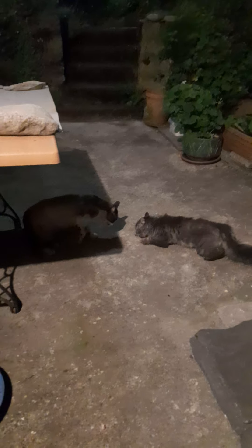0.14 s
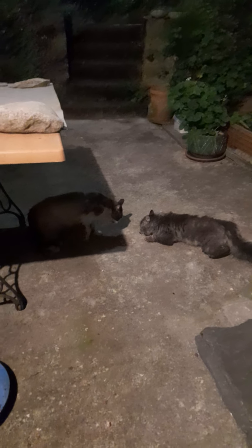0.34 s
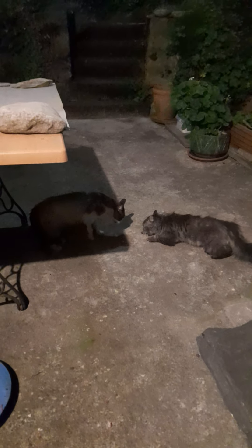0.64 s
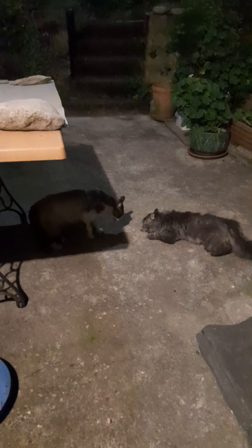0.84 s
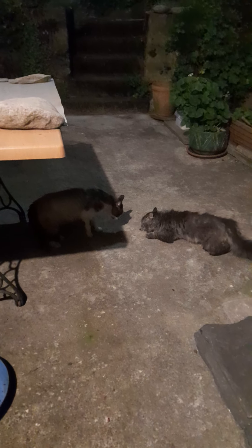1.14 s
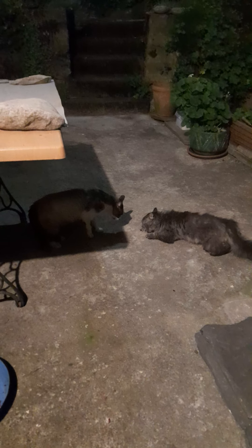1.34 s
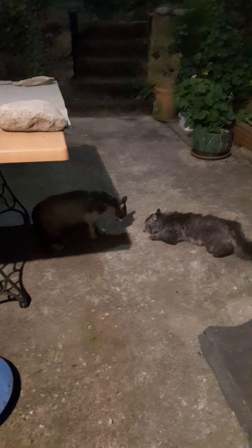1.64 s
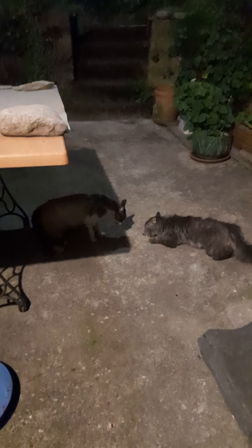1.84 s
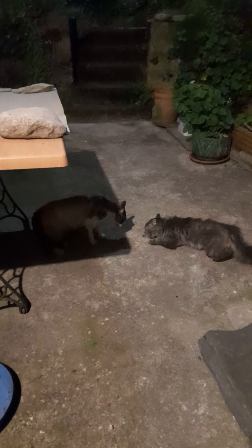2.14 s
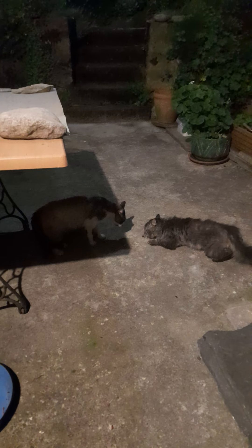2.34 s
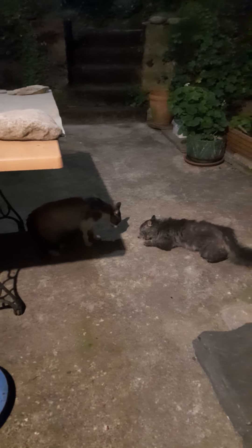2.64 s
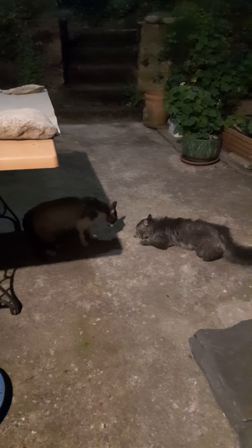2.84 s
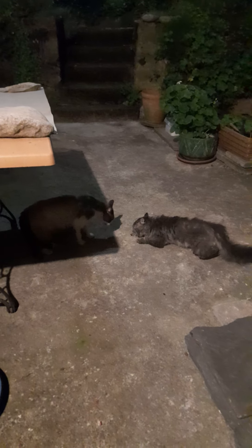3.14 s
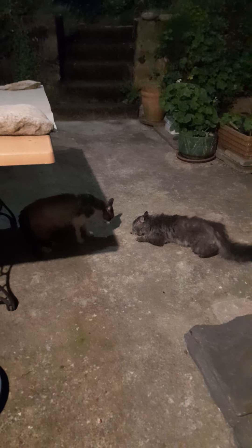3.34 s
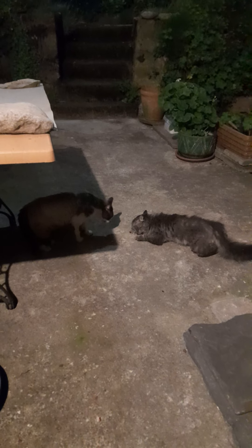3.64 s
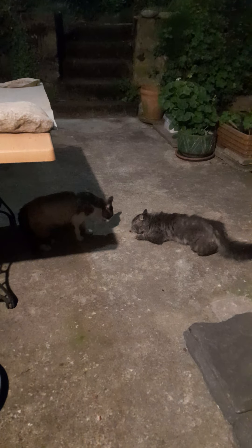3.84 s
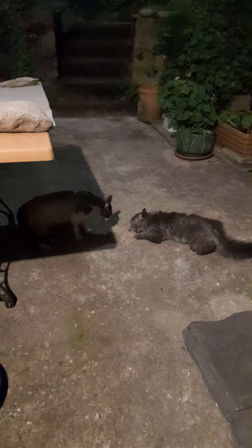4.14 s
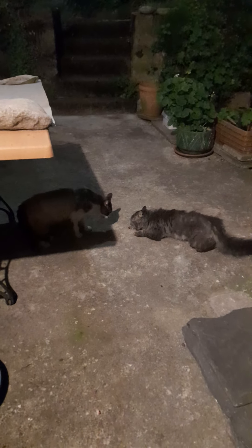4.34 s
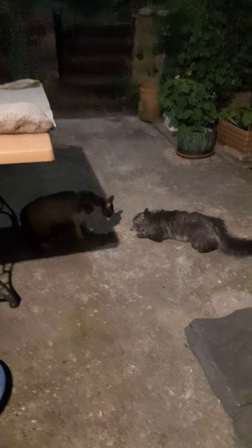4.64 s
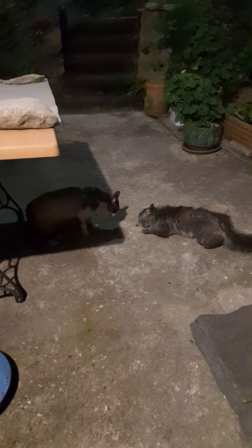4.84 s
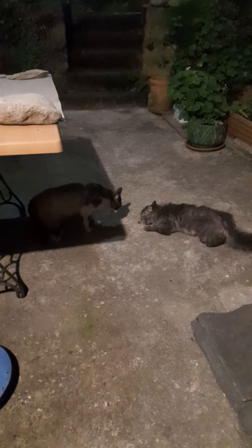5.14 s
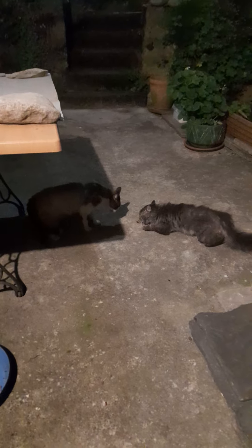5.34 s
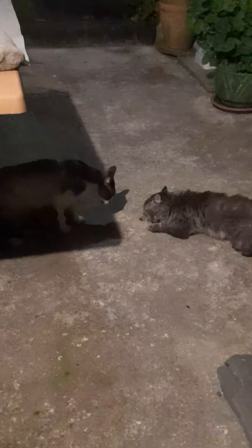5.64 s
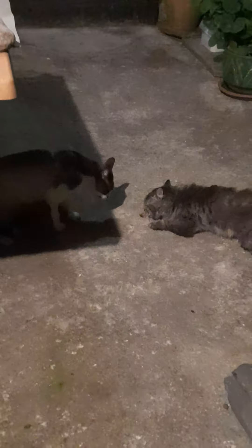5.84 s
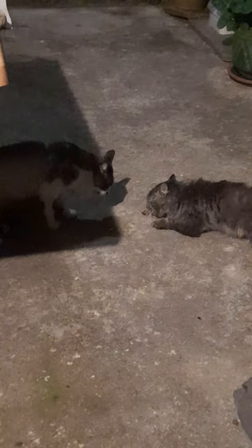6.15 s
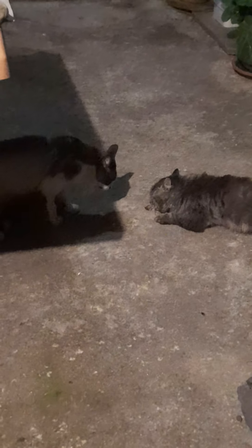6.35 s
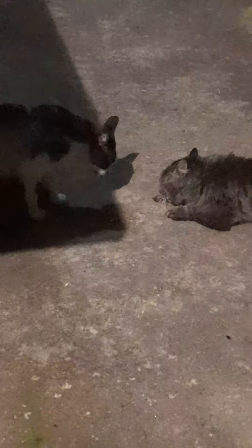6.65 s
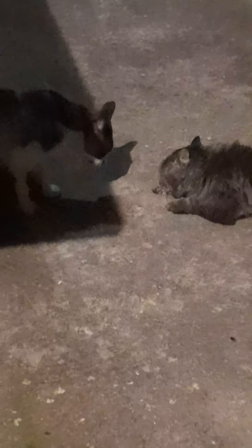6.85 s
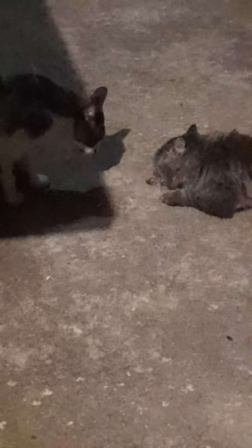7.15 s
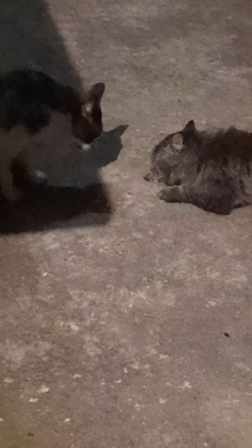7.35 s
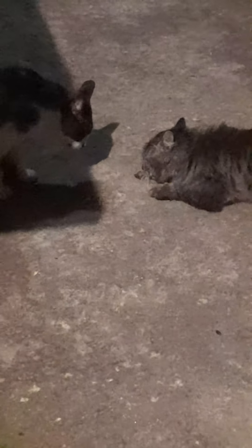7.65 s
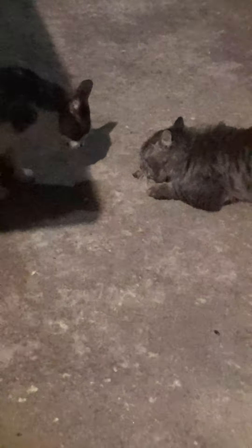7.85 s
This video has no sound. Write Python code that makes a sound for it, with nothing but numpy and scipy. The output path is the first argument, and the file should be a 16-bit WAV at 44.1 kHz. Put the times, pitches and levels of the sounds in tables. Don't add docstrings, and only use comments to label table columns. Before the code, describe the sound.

A cat yowls at another on a walled patio, two long wavering cries sinking into growls and croaks, with a quiet low moan underneath.

```python
import sys
import numpy as np
from scipy import signal
from scipy.fft import rfft, irfft, next_fast_len
from scipy.io import wavfile
from scipy.ndimage import uniform_filter1d

SR = 44100
rng = np.random.default_rng(int(sys.argv[2]) if len(sys.argv) > 2 else 0)


def wrap_up_sound(samples):
    columns = np.atleast_2d(samples).T
    tamed = np.clip(columns, -1, 1)
    steps = np.round(tamed * 32767).astype(np.int16)
    wavfile.write(sys.argv[1], SR, steps)


def nominal_scale(level):
    x = np.asarray(level, float) / 20
    return 10 ** x


N = 353139

# f/Hz, level/dB
HIGH_RESONANCES = [(5400, -14), (6500, -13), (7200, -15), (8100, -7.5), (8900, -20), (11000, -43.5)]
PORT_LEAD = .22


def evened(x):
    return x / np.sqrt(np.mean(x ** 2) + 1e-20)


def read(points, hz):
    f, value = np.transpose(points)
    return np.interp(np.log(hz + 1), np.log(f + 1), value)


def unrolled(rows):
    s, *columns = np.transpose(rows)
    n = np.arange(round(s[0] * SR), min(round(s[-1] * SR), N))
    return n[0], n / SR, [np.interp(n / SR, s, c) for c in columns]


def add(mix, start, sound):
    mix[:, start:start + sound.shape[1]] += sound


def bump(x, at, half):
    return np.exp(-np.minimum(((x - at) / half) ** 2, 30))


def wobble(count, span):
    step = max(span // 16, 1)
    knots = rng.standard_normal(count // step + 2)
    knots = uniform_filter1d(uniform_filter1d(knots, span // step), span // step)
    return np.interp(np.arange(count) / step, np.arange(len(knots)), evened(knots))


def coloured(x, points):
    size = next_fast_len(x.shape[-1])
    gain = nominal_scale(read(points, np.fft.rfftfreq(size, 1 / SR)))
    return irfft(rfft(x, size) * gain, size)[..., :x.shape[-1]]


def resonate(x, hz, width):
    turn = np.exp(2j * np.pi * np.cumsum(hz) / SR)
    r = np.exp(-np.pi * width / SR)
    return 2 * (turn * signal.lfilter([1 - r], [1, -r], x / turn)).real


def partial(angle, db, pan_db, lead):
    left, gap = nominal_scale(pan_db / 2), np.clip(lead, -2.6, 2.6)
    size = np.sqrt(8) * nominal_scale(db) / np.sqrt(left ** 2 + left ** -2. + 2 * np.cos(gap))
    return np.array([size * left * np.cos(angle + gap / 2), size / left * np.cos(angle - gap / 2)])


def night():
    # f/Hz, level/dB per Hz
    floor_colour = [(22, -42), (48, -18), (100, -13), (170, -12), (300, -13), (600, -11.5), (1200, -16.5),
                    (2500, -23.5), (5000, -34.5), (9000, -38), (11500, -31), (15700, -28)]
    # f/Hz, likeness [-1..1]
    likeness = [(30, 0), (150, 0), (400, 1), (2000, 0), (8000, 0), (15000, 0.082)]
    # t/s, half length/s, whole floor level/dB, extra breeze rumble level/dB
    gusts = [
        (0, 0.32, 1.5, -4),
        (1.017, 0.33, -3, 3),
        (2.003, 0.25, 0, -2.5),
        (4.002, 0.42, -0.5, 6),
        (4.455, 0.25, -11.5, 0),
        (4.737, 0.46, 5, 5),
        (5.392, 0.25, 4.5, 0),
        (6.395, 0.55, 0, 10.5),
        (7.699, 0.43, -2.5, -1.5),
    ]
    frames, hz = N // 256 + 5, np.fft.rfftfreq(1024, 1 / SR)
    a, b, c, d, patches = rng.standard_normal((frames, 513, 5)).T
    patches = evened(uniform_filter1d(uniform_filter1d(patches, 12, 0), 10, 1))
    same = np.clip(read(likeness, hz), -1, 1)[:, None]
    left = a + 1j * b
    z = np.array([left, same * left + np.sqrt(1 - same ** 2) * (c + 1j * d)])
    t = np.arange(frames) * 256 / SR
    db, breeze_db = sum(np.outer(levels, bump(t, at, half)) for at, half, *levels in gusts)
    swell_db = .7 * wobble(frames, span=12) + .8 * wobble(frames, span=2)
    low = 1 / (1 + (hz[:, None] / 200) ** 4)
    floor_db = -79 + 10.5
    z *= nominal_scale(read(floor_colour, hz)[:, None] + 0.6 * patches + swell_db + floor_db + db + low * breeze_db)
    z[:, 0] = 0
    return signal.istft(z, nperseg=1024, noverlap=768)[1][:, :N]


def patio():
    # f/Hz, t60/s
    decay = [(200, 0.12), (1000, 0.2), (3000, 0.12), (8000, 0.011)]
    taps = np.zeros((2, SR // 2))
    at = np.arange(300, SR // 2 - 20, 20) + rng.integers(0, 20, (2, (SR // 2 - 301) // 20))
    np.put_along_axis(taps, at, rng.choice([-1., 1.], at.shape), 1)
    hz, t, z = signal.stft(taps, SR, nperseg=256)
    tail = signal.istft(z * nominal_scale(-60 * t / read(decay, hz)[:, None]), SR, nperseg=256)[1]
    return tail / np.linalg.norm(tail[0])


def echoes(x):
    # t/ms after the direct sound, signed share
    left_taps = [(0.768, 0.452), (1.118, -0.276), (1.282, 0.456), (1.987, 0.239), (2.683, -0.191),
                 (4.984, 0.16), (9.684, 0.17), (17.012, 0.145)]
    # t/ms after the direct sound, signed share
    right_taps = [(0.337, 0.137), (1.31, 0.221), (2.462, -0.206), (4.092, -0.281), (5.892, -0.212),
                  (6.777, -0.099), (7.905, -0.133), (11.234, 0.101)]
    size = next_fast_len(x.shape[1] + 2000)
    hz = np.fft.rfftfreq(size, 1 / SR)
    paths = [1 + sum(share * np.exp(-2j * np.pi * hz * ms / 1e3) for ms, share in ear)
             for ear in (left_taps, right_taps)]
    return irfft(rfft(x, size) * paths, size)[:, :x.shape[1]]


def moan(rows):
    # f/Hz, level/dB
    muzzle = [(160, -8), (250, -1.5), (390, 6.5), (520, 12), (660, 3.5), (780, -4.5), (1000, -13.5),
              (1500, -33.5)]
    start, t, (hz, effort_db, step_db) = unrolled(rows)
    hz = hz * (1 + 0.003 * wobble(len(t), span=300))
    angle = 2 * np.pi * np.cumsum(hz) / SR
    voice = sum(partial(k * angle, effort_db + min(k - 1, 1.5) * step_db + read(muzzle, k * hz), 0.43, PORT_LEAD)
                for k in range(1, 5))
    return start, voice * signal.windows.tukey(len(t), .01)


def onset(t, fade_s):
    return (t[0] > 0) * np.exp(-(t - t[0]) / fade_s)


def folds(t, glide_hz):
    # t/s, pitch shift/Hz, level change/dB, half length/s
    catches = [(0.391, 2, 1.5, 0.0096), (0.691, 1.5, -2.5, 0.009056), (1.265, -2.5, 9, 0.026),
               (2.702, -8.5, 4.5, 0.033), (5.271, 0.5, -4, 0.042), (5.673, -3, 9.5, 0.03),
               (0.485, 11.5, -5.5, 0.0095), (0.115, 1.5, -3, .025), (1.538, -15, -6, 0.015),
               (1.579, 9.5, -1.5, 0.014), (1.96, 14, -8, 0.022), (2.12, 22, -4.5, 0.01),
               (2.196, 5.5, -2.5, .02), (2.295, 6.5, 1, 0.0058), (2.481, -10.5, -6, 0.013),
               (2.633, 13, -3, 0.007), (2.745, 8.5, -4.5, 0.0077), (4.794, -1, -3.5, .012),
               (5.401, 4.5, 2.5, 0.032), (6.974, 7, -4, 0.015), (7.082, 10, 2.5, 0.014),
               (7.189, 10.5, -2.5, .015), (7.329, 10.5, -3, 0.018), (7.434, 7, -3, 0.017),
               (7.509, 11, -2.5, 0.01), (7.591, 1.5, -2.5, 0.013), (0.787, 7, 1, .04),
               (1.32, -8.5, 3.5, .04), (1.909, -4, -1.5, 0.028), (2.199, -6, 0, 0.098),
               (4.749, -7.5, -0.9, 0.023), (4.832, 7.5, -1.5, .03), (5.018, -4.5, 3.5, 0.051),
               (5.596, 8.5, 3.5, 0.042), (5.735, -8.5, -1.5, 0.042), (6.602, 4.5, -2, .04),
               (6.936, -7, -2.5, 0.026), (7.361, 6, 2, 0.031), (7.12, -2, 2.5, 0.022)]
    # t/s, half length/s, share of pitch
    hoarse_stretches = [(.45, .12, .01), (1.42, .14, .012), (2.2, .1, .016), (2.55, .1, .016),
                        (2.8, .16, .013), (4.72, .09, .014), (5.62, .1, .012), (7.2, .3, .012)]
    hz = glide_hz + sum(jump_hz * bump(t, at, half) for at, jump_hz, _, half in catches)
    dip_db = sum(db * bump(t, at, 0.9 * half) for at, _, db, half in catches)
    unsteady = sum(share * bump(t, at, half) for at, half, share in hoarse_stretches)
    hz = hz * (1 + (.0018 + .3 * unsteady) * wobble(len(t), span=300))
    stumble = 2 * np.pi * np.cumsum(hz * unsteady * wobble(len(t), span=60)) / SR
    angle = 2 * np.pi * np.cumsum(hz) / SR
    return hz, dip_db, angle, stumble


def croak(t, bouts):
    rise, fall_db = 0.11, -20
    db, share = np.full(len(t), -99.), np.zeros(len(t))
    for start, length, top_db in bouts:
        u = (t - start) / length
        arch = np.where(abs(u - .5) < .5, np.interp(u, [0, rise, 1], [0, 1, 0]), -1)
        db = np.maximum(db, np.where(arch < 0, -99, top_db + fall_db * (1 - arch) ** 2))
        share = np.maximum(share, arch)
    return db, share


def rasp(angle, hz, every, db, slip, colour):
    on, out = db > -92, np.zeros((2, len(hz)))
    slide = wobble(len(hz), span=300)
    for k in range(every + 1, 6 * every):
        if k % every:
            drift = k * k + slip * np.roll(slide, k * 5003)[on]
            line_db = db[on] + 3 * slip * np.roll(slide, 9001)[on] + read(colour, k * hz[on] / every)
            out[:, on] += partial(k * angle[on] / every + drift, line_db, 0, 0.94)
    return out


def shifts_db(t, hz):
    # t/s, half length/s, f/Hz, level/dB
    passing_shifts = [(.55, 0.054, 525, -5), (0.85, .1, 600, 1), (2.98, .07, 1400, 6.5),
                      (2.38, 0.045, 525, 3), (.36, 0.055, 1990, -5), (0.783, .06, 1780, 2.5),
                      (5.18, 0.14, 575, 3.5), (5.7, 0.12, 340, -2.5), (7.6, 0.35, 510, 1.5),
                      (8.5, 0.041, 1410, 5), (0.64, 0.098, 1300, 1.5), (.9, 0.15, 1200, -8),
                      (1.191, 0.062, 1180, 4), (1.595, 0.084, 1010, -9), (2.3, 0.037, 1040, -11.5),
                      (4.97, 0.048, 1125, 3), (5.53, 0.076, 1050, -10.5), (9, 0.07, 935, -8),
                      (0.52, 0.14, 1530, -9), (1.7, 0.019, 1630, -2), (1.59, 0.033, 1520, 9),
                      (1.76, 0.066, 1390, 7), (2.06, .08, 1430, -8.5), (2.432, 0.22, 1540, -8.5),
                      (2.67, 0.049, 1460, -10.5), (4.8, .05, 1570, 9), (5.05, 0.064, 1700, -7.5),
                      (6, 0.05, 1660, 6.5), (6.87, 0.056, 1370, 8), (7.4, 0.14, 1440, -11),
                      (1.03, .06, 1815, -4), (3.71, 0.26, 830, -4), (0.88, 0.071, 1790, 4),
                      (.05, 0.08, 1400, -4), (3.3, 0.065, 1500, 5), (8.6, .06, 1860, -10),
                      (5.42, .1, 1650, 1.5), (4.15, 0.092, 1480, -20), (8.1, 0.045, 910, 5),
                      (5.06, 0.026, 1150, -2),
                      (.58, 0.055, 2120, 11.5), (1.25, 0.098, 2266, -10), (2.1, 0.096, 1920, 2.5),
                     (2.6, 0.057, 1963, -2), (4.92, 0.061, 2230, 16.5), (5.33, 0.083, 2220, -9),
                     (5.72, 0.063, 1980, 15), (6.12, 0.2, 1680, 6), (6.85, 0.091, 1827, -6),
                     (7.43, .03, 1933, 7), (7.14, .06, 1880, -8), (7.39, 0.02, 1412, 9.5),
                     (.6, .05, 2690, 7.5), (1.03, 0.043, 3040, -6), (1.29, 0.051, 2700, 19.5),
                     (1.55, 0.19, 2550, 14), (1.85, 0.19, 2320, -13.5), (2.12, 0.073, 2400, -10.5),
                     (2.6, 0.13, 2470, -12), (2.85, 0.033, 2345, -12), (4.75, 0.053, 2230, -10),
                     (4.97, 0.065, 2780, -19.5), (5.2, 0.19, 2880, -17.5), (6.0, 0.26, 2210, -16),
                     (7.2, 0.082, 2360, -15.5), (.1, 0.17, 2540, 4.5), (.46, 0.029, 2030, 4.5),
                     (2.2, 0.15, 2010, 4), (3.4, .3, 2580, 21.5), (5.58, .08, 2500, -11),
                      (.62, 0.043, 4250, 12), (.72, 0.046, 6390, 22), (0.949, 0.12, 5360, 9.5),
                  (1.101, 0.094, 4200, 7.5), (1.17, .05, 4740, 5.5), (1.309, 0.036, 3970, 8),
                  (1.36, .06, 3280, 1), (1.45, 0.1, 5050, -18), (1.52, 0.05, 5300, 14),
                  (1.55, 0.062, 3740, -16), (1.8, 0.14, 4260, 16.5), (1.801, .08, 2900, 20.5),
                  (2.199, .07, 3900, -10.5), (2.4, 0.084, 4300, 22), (2.711, 0.043, 4190, 5),
                  (2.86, 0.05, 4220, 2), (4.95, 0.17, 3230, 16), (4.9, 0.04, 3900, 6),
                  (5.05, 0.14, 4140, -12), (5.15, 0.085, 4580, 7.5), (5.38, 0.086, 4460, -19),
                  (5.5, 0.11, 5600, 22.5), (5.54, .05, 5050, 22.5), (5.75, 0.059, 4440, 6.5),
                  (6.15, 0.16, 3200, 10.5), (6.35, 0.052, 3880, 16.5), (6.151, 0.13, 4270, -10.5),
                  (7.9, .04, 4050, 5.5), (6.12, .1, 3750, -6), (6.7, .08, 2100, -6), (.77, .06, 4260, 17.5),
                  (.35, 0.046, 5870, 7), (5.1, 0.18, 8200, 9.5), (5.0, 0.067, 7900, 6),
                  (6.92, 0.12, 4160, -5.5), (1.38, 0.068, 4940, -15.5), (2.3, .15, 3600, 6.5),
                  (6.5, .15, 3080, 10), (5.0, 0.11, 6200, -14), (5.75, 0.092, 5350, -8.5),
                  (.08, 0.057, 4100, -3), (.3, 0.084, 1900, -4)]
    s, f = t[::128], hz[::128]
    rows = passing_shifts
    width_hz = 190
    return np.interp(t, s, sum(db * bump(s, at, half) * bump(f, mid_hz, width_hz) for at, half, mid_hz, db in rows))


def mouth_db(t, hz, effort_db, jaw):
    # f/Hz, level/dB
    shut = [(425, 7.5), (600, -3.5), (850, 1.5), (1150, -5), (1500, -29.5), (1900, -18), (2300, -22),
            (3000, -64.5)]
    # f/Hz, level/dB
    wide = [(425, -35), (600, -45), (850, 0.5), (1150, -20), (1500, -40), (1900, -10.5), (2300, -29.5),
            (3000, -45)]
    # t/s, half length/s, level/dB
    tongue = [
        (.56, .07, -22),
        (1.43, .055, -22),
        (2.3, .17, -12),
        (4.92, .05, -25),
        (5.47, .1, -15),
        (5.7, .12, -14),
        (5.9, .1, -25),
        (7.3, .15, -5),
    ]
    dull_db = sum(db * bump(t, at, half) for at, half, db in tongue)
    pursed = onset(t, fade_s=.09)
    levels = []
    for k in range(1, 6):
        f = k * hz
        db = effort_db + shifts_db(t, f) + (1 - jaw) * read(shut, f) + jaw * read(wide, f)
        db = db - 10 * bump(f, 2720, 90)
        db = db + 24.5 * pursed * bump(f, 1550, 356)
        levels.append(db + dull_db / (1 + np.exp((2180 - f) / 90)))
    return levels


def low_partials(t, angle, stumble, dip_db, low_db):
    stutter_db = -6.5 * bump(t, 7.14, .07) * np.cos((angle + 9 * stumble) / 12) ** 6
    voice = 0
    for k, db in enumerate(low_db, 1):
        catch_db = np.where(dip_db > 0, k == 2, 1) * dip_db
        db = db + (k > 1) * stutter_db + catch_db
        voice = voice + partial(k * (angle + 0.32 * stumble) + k - 1, db, 0, 0)
    return echoes(voice)


def high_partials(t, hz, angle, stumble, dip_db, jaw, ring_hz, ring_db, gape_db):
    # f/Hz, level/dB
    throat = [(3000, -23.5), (3500, -15), (3900, 0), (4200, 6), (4550, -6), (5400, -27), (6500, -51.5)]
    attack = onset(t, fade_s=.26)
    narrow = 1 + .6 * np.clip(1 - jaw, 0, 1)
    faint_db = 0.33 * np.minimum(ring_db + 76.5, 0)
    shrill = nominal_scale(-82) * bump(t, 5.4, .15)
    voice = np.zeros((2, len(t)))
    for k in range(6, 24):
        f = k * hz
        shimmer_db = shifts_db(t, f) + 4 * wobble(len(t), span=2500) + 2.1 * wobble(len(t), span=150)
        ring = nominal_scale(ring_db + faint_db + read(throat, 4200 * (f / ring_hz) ** narrow))
        high = nominal_scale(gape_db + read(HIGH_RESONANCES, f) + 31.5 * attack * bump(f, 6690, 600))
        high = high + shrill * bump(f, 12300, 1500)
        lead = .0006 * f + 2.5 * wobble(len(t), span=5000)
        phase = k * (angle + stumble) + k * k
        voice += (ring + high) * partial(phase, shimmer_db + np.minimum(dip_db, 0), lead, 1.5)
    return voice


def breathing(hz, jaw, low_db, breath_db, ring_hz, ring_db, gape_db):
    # f/Hz, level/dB
    breath_colour = [(500, -31), (800, -11.5), (1100, -2), (2350, 0), (2650, -27), (3300, -38), (4200, -30),
                     (9000, -68)]
    effort = np.sqrt(sum(nominal_scale(2 * db) for db in low_db[:3]))
    air = rng.standard_normal((2, len(hz)))
    puffs_db = breath_db + 3.5 * wobble(len(hz), span=400)
    breath = evened(coloured(air + 0.15 * air[::-1], breath_colour))
    breath = breath * nominal_scale(puffs_db) * uniform_filter1d(effort, size=3000)
    chest = evened(resonate(resonate(air, 0.52 * hz, 500), 0.52 * hz, 500))
    chest = chest * nominal_scale(low_db[0] - 34.0 - 8 * jaw)
    ring = evened(resonate(resonate(air, ring_hz, 800), ring_hz, 800)) * nominal_scale(ring_db - 9.5)
    upper_air = evened(coloured(air, HIGH_RESONANCES)) * nominal_scale(gape_db - 4.0 + np.array([[2.2], [-2.2]]))
    return breath + chest + ring + upper_air


def ghost(t, angle, first_db, jaw):
    return partial(angle - 2 * np.pi * 184 * t, first_db - 31.5 - 1.5 * jaw, 0, PORT_LEAD)


def yowl(rows):
    # t/s, length/s, level/dB
    every_2nd = [
        (3.15, 0.76, -68),
        (3.504, 0.84, -63.5),
        (7.599, 0.33, -69),
        (7.82, 0.16, -60.5),
    ]
    # t/s, length/s, level/dB
    every_3rd = [
        (7.035, .34, -57),
        (7.43, .15, -65),
        (7.77, .14, -66),
    ]
    # f/Hz, level/dB
    growl_colour = [(420, -10), (620, -6.5), (1050, 0), (1450, -24.5), (2150, -2.5), (2500, -20)]
    # f/Hz, level/dB
    rasp_colour = [(500, -28), (800, 0), (1250, -7), (1700, -12.5), (2150, -2), (2500, -29.5)]
    start, t, (glide_hz, effort_db, jaw, lips) = unrolled(rows)
    ring_hz = -1300 * onset(t, fade_s=.39) * jaw + 3992 + 3.63 * (glide_hz - 420)
    ring_hz = ring_hz + 7.8 * np.maximum(glide_hz - 509.3, 0)
    ring_db = -100 + 37 * lips
    gape_db = -106 + 26.5 * lips + 18.5 * jaw
    second_db, _ = croak(t, every_2nd)
    third_db, hoarse = croak(t, every_3rd)
    breath_db = -38 + 6 * hoarse + 8.5 * onset(t, fade_s=.26) + 0.5 * jaw
    hz, dip_db, angle, stumble = folds(t, glide_hz)
    low_db = mouth_db(t, hz, effort_db, jaw)
    voice = low_partials(t, angle, stumble, dip_db, low_db)
    voice += high_partials(t, hz, angle, stumble, dip_db, jaw, ring_hz, ring_db, gape_db)
    voice += rasp(angle, hz, every=2, db=second_db, slip=.9, colour=growl_colour)
    voice += rasp(angle, hz, every=3, db=third_db, slip=.22, colour=rasp_colour)
    voice += breathing(hz, jaw, low_db, breath_db, ring_hz, ring_db, gape_db)
    voice += ghost(t, angle, low_db[0], jaw)
    edge = np.minimum(1, np.minimum(t - t[0] + (t[0] < .01), t[-1] - t + (t[-1] > 8)) / .005)
    return start, voice * edge


def scene():
    # t/s, pitch f/Hz, effort level/dB, level step per partial/dB
    moan_1 = [(4.17, 385, -74, -17), (4.2, 382, -53.5, -6.5), (4.28, 400, -61, -5.5), (4.4, 351, -68, 0),
              (4.55, 333, -65, 6), (4.63, 302, -71, 5)]
    moan_2 = [(4.631, 309, -68, -1), (4.701, 312.2, -63.5, 7.5), (5.002, 250.7, -64.5, 0.5),
              (5.201, 235.5, -52.5, -13.5), (5.501, 256.4, -62.5, -1.5), (5.8, 265, -71, 7.5),
              (6.3, 256.3, -60.5, -5.5), (6.6, 219.2, -63, -0.5), (6.67, 233.2, -68.5, 5)]
    moan_3 = [(6.671, 237.8, -66, 3), (6.801, 212.3, -52.5, -7.5), (6.881, 184.7, -55.5, -7.5),
              (7.052, 176.3, -52.5, -10.5), (7.099, 160.9, -62, -3)]
    grunt = [
        (7.77, 492, -67.5, -22),
        (7.82, 510, -64.5, -22),
        (7.86, 533, -78, -14),
    ]
    # t/s, pitch f/Hz, effort level/dB, jaw opening [0-1], lips parted [0-1]
    rise_1 = [
        (0, 524, -33.5, 0.29, 0.77),
        (.06, 509, -44.5, 0.029, 0.99),
        (.15, 474.2, -31, 0.3, 0.8),
        (.25, 489.4, -30, 0.47, 0.8),
        (.39, 493.6, -29, 0.44, 0.78),
        (.46, 508.3, -26.5, 0.35, 0.81),
        (.59, 531.8, -20.5, 0.39, 0.9),
        (.71, 583, -15.5, 0.85, 0.68),
    ]
    cry_1 = [(.71, 587, -14, .85, 0.79), (0.83, 591.6, -9, 1.1, 0.69), (1.025, 605.1, -8.5, 1.15, 0.69),
             (1.15, 598.6, -12, 1, 0.81), (1.28, 550.5, -21.5, 0.63, 0.93),
             (1.379, 568.5, -25.5, 0.6, 0.81), (1.5, 527.8, -33, 0.19, 0.95), (1.551, 515, -35, 0.13, 1),
             (1.62, 494.6, -37.5, 0.19, 0.68)]
    waver_1 = [(1.62, 495.1, -34.5, 0.17, 0.62), (1.723, 458, -33, 0.28, 0.73),
               (1.95, 477.5, -27, 0.32, 0.85), (1.999, 467.2, -30, 0.33, 0.86),
               (2.368, 530.7, -29, 0.33, 0.57), (2.651, 486.9, -32, 0.34, 0.58),
               (2.762, 495.5, -34.5, 0.29, 0.6), (2.875, 460.6, -30.5, 0.35, 0.57),
               (2.998, 468.7, -43.5, 0.074, 0.35)]
    sink_1 = [(3.0, 467, -37, .14, 0.52), (3.16, 450.2, -40.5, 0.28, 0), (3.341, 432.5, -36.5, 0.35, 0.33),
              (3.54, 419.6, -40.5, 0.25, 0.16), (3.835, 413.5, -46.5, 0.071, 0.14),
              (4.001, 402.7, -52, 0.018, 0), (4.153, 365, -53.5, 0.064, 0.0026),
              (4.211, 345, -52, 0.094, 0.0046), (4.25, 361, -87, 0.58, 0.058)]
    cry_2 = [
        (4.66, 324, -47.5, 0.074, 0.11),
        (4.699, 415.4, -31, 0.39, 0.68),
        (4.779, 515.7, -23, 0.45, 0.9),
        (4.924, 557.4, -7.5, 1, 0.65),
        (5.098, 579.7, -13.5, 0.96, 0.8),
        (5.268, 571.9, -18.5, 0.74, 0.82),
        (5.473, 541.7, -24, 0.41, 0.83),
        (5.667, 462, -35.5, 0.25, 0.8),
        (5.75, 493.8, -40.5, 0.038, 0.85),
    ]
    drone_2 = [(5.75, 488, -32, .04, .75), (5.788, 488.3, -42, 0.039, 0.73),
               (5.861, 460, -41.5, 0.11, 0.59), (6.031, 420.1, -36, 0.24, 0.52),
               (6.21, 417.2, -35.5, 0.2, 0.55), (6.36, 431.5, -32, 0.4, 0.4),
               (6.499, 440.9, -34.5, 0.26, 0.48), (6.789, 451.7, -38.5, 0.31, 0.14),
               (6.972, 469.8, -39.5, 0.11, 0.43)]
    croak_2 = [(6.97, 472.0, -40.6, 0.04, 0.33), (7.26, 470.6, -38.5, 0.17, 0.32),
               (7.453, 475, -40.5, 0.16, 0.23), (7.528, 466.6, -39.5, 0.18, 0.22),
               (7.647, 473.8, -48.5, 0.052, 0.17), (7.775, 468.4, -44, 0.11, 0.15),
               (7.89, 463.5, -47.5, 0.087, 0.075), (8.007, 479.3, -63.5, -0.31, 0.08)]
    walls, floor, cats = patio(), night(), np.zeros((2, N))
    add(cats, *moan(moan_1 + moan_2[1:] + moan_3[1:]))
    add(cats, *moan(grunt))
    add(cats, *yowl(rise_1 + cry_1[1:] + waver_1[1:] + sink_1[1:]))
    add(cats, *yowl(cry_2 + drone_2[1:] + croak_2[1:]))
    reverb = signal.fftconvolve(cats, walls, axes=1)[:, :N]
    return nominal_scale(0.11) * cats + nominal_scale(-15.0) * reverb + floor


def roll_off(x):
    return signal.sosfilt(signal.butter(12, 15840, fs=SR, output="sos"), x)


def record(dry):
    return roll_off(dry)


dry = scene()
out = record(dry)
wrap_up_sound(out)
```